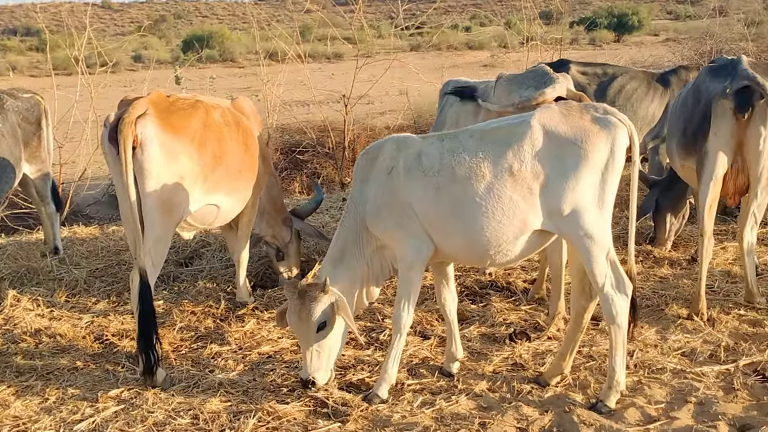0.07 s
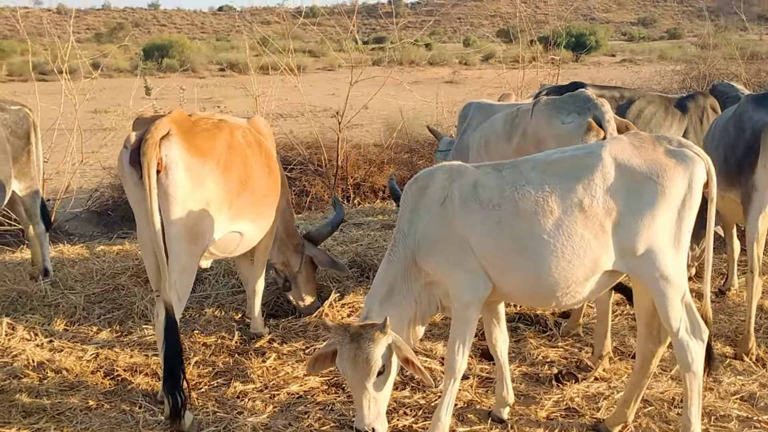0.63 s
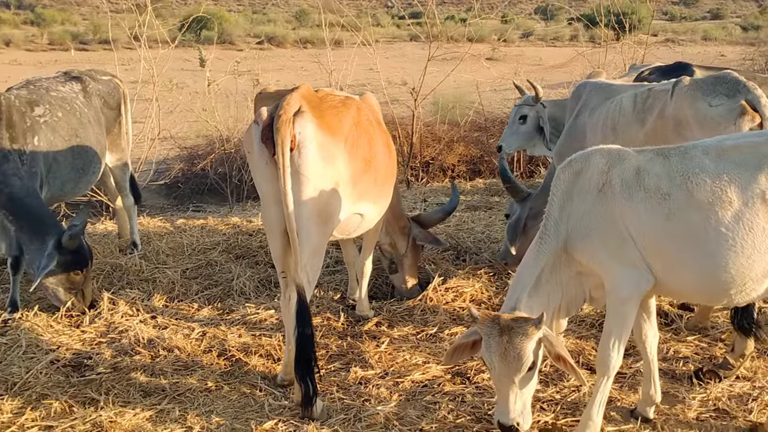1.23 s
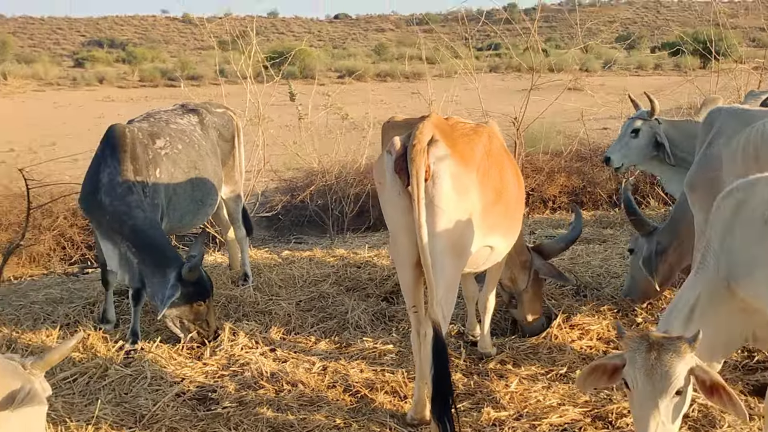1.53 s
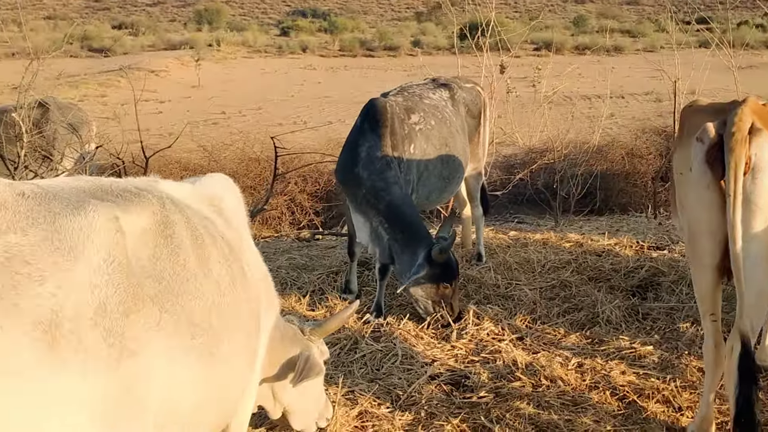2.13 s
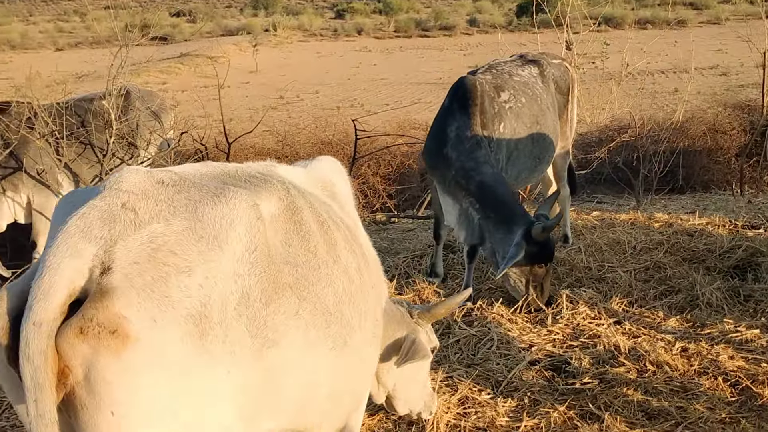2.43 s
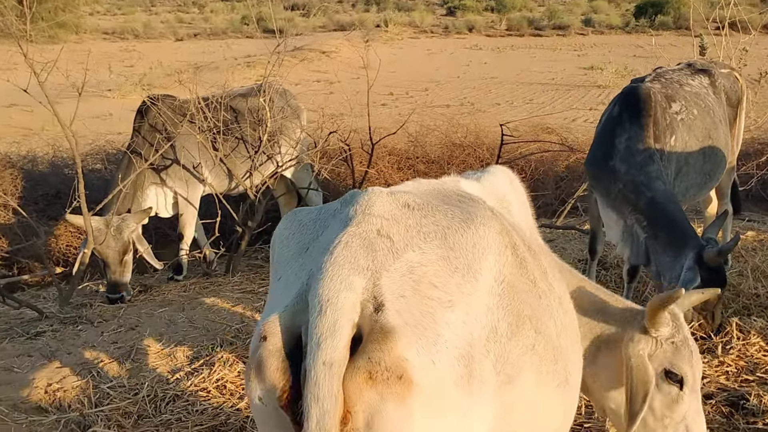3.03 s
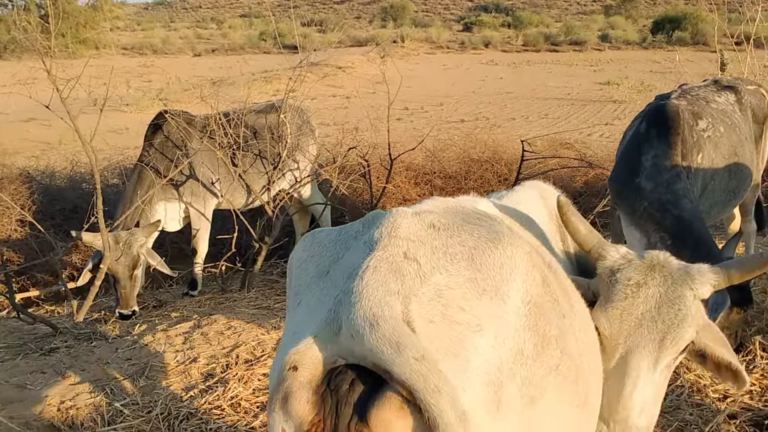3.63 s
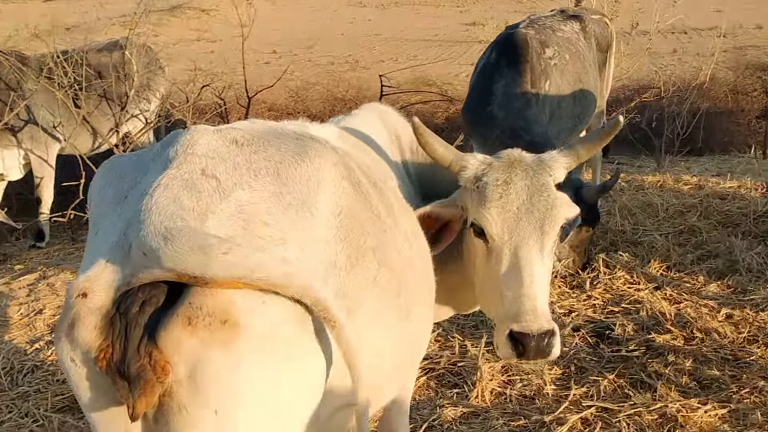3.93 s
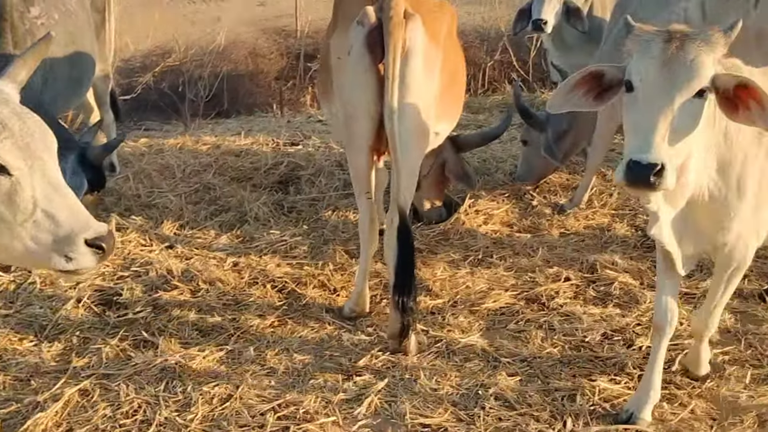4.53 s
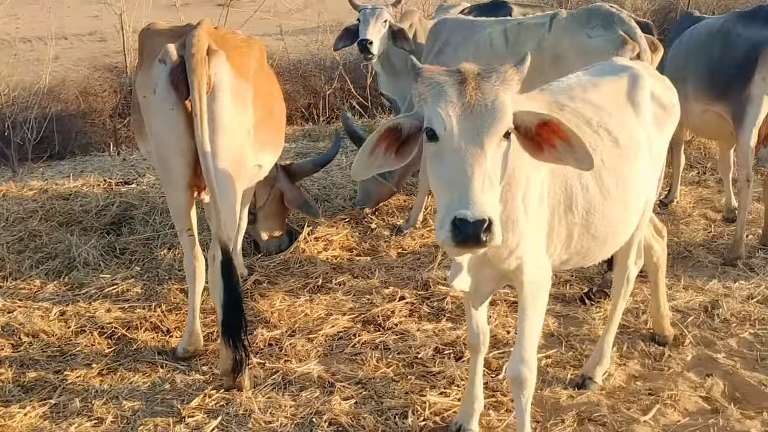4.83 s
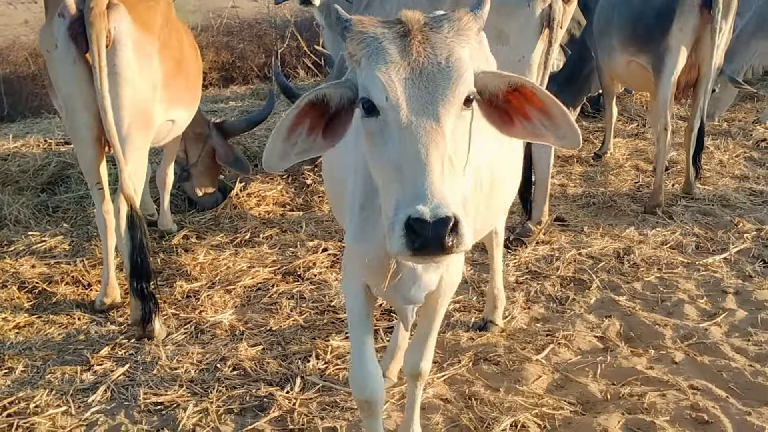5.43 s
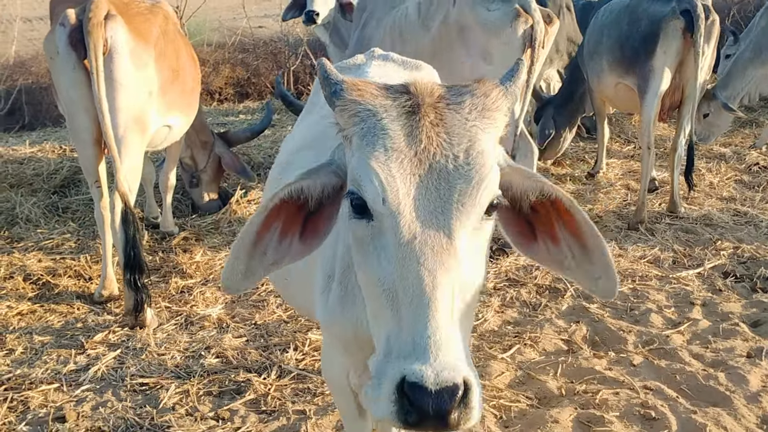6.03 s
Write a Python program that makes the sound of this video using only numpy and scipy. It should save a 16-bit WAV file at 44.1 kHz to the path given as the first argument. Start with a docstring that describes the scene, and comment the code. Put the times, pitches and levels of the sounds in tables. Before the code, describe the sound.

Outdoors, over a soft wash of air and a faint distant drone, cattle tug and tread dry straw, which crackles quietly. A small cowbell clinks brightly and irregularly throughout, more often in the first half. Then close, low gusts of wind start hitting the microphone and become the loudest sound, while the bell carries on and an occasional stalk snaps or a hoof crunches on sand.

```python
"""A small metal bell on a cow's neck clinks with every tug and step as cattle graze in the open.
Its clapper hits a new spot on the rim each time, so each clink rings with a different mix of tones.
Dry straw rustles, slides and snaps under hooves and muzzles, and hooves crunch on sand.
Gusts of wind buffet the microphone, over a soft wash of air and a faint far drone."""
import sys
import numpy as np
from scipy import signal
from scipy.fft import rfft, irfft
from scipy.io import wavfile

SR = 44100
rng = np.random.default_rng(int(sys.argv[2]) if len(sys.argv) > 2 else 0)


def dump_mix(stems):
    """Bounce the given channels to the path in sys.argv[1] as a 16-bit WAV at rate SR."""
    frames = np.atleast_2d(stems).T  # one column per channel
    limited = np.clip(frames, -1, 1)  # hard clip at full scale
    pcm = np.round(limited * 32767).astype(np.int16)
    wavfile.write(sys.argv[1], SR, pcm)


N = 276507
TIME = np.arange(N) / SR


def gain_of(db):
    """Turns decibels into a number to multiply a sound by."""
    return 10 ** (np.asarray(db) / 20)


def evened(x):
    """Scales a sound so that its average size (rms) is 1."""
    return x / np.sqrt(np.mean(x ** 2) + 1e-20)


def add(mix, s, sound):
    """Mixes a sound in, starting at s seconds."""
    part = mix[max(round(s * SR), 0):][:len(sound)]
    part += sound[:len(part)]


def coloured(x, colour):
    """Gives x a tone colour, listed as (f/Hz, level/dB) points; the result has rms 1."""
    hz, db = np.transpose(colour)
    f = np.fft.rfftfreq(len(x), 1 / SR)
    curve_db = np.interp(np.log(f + 1), np.log(hz), db)
    return evened(irfft(rfft(x) * gain_of(curve_db), len(x)))


def drift(rate):
    """A smooth random wander of rms 1, with up to about `rate` wobbles a second."""
    f = np.fft.rfftfreq(N, 1 / SR)
    return evened(irfft(rfft(rng.standard_normal(N)) / (1 + (f / rate) ** 4), N))


def grains(per_s, spread_db):
    """Scattered clicks, most small and a few large."""
    size = gain_of(spread_db * np.minimum(rng.exponential(1, N), 4.5))
    return evened(size * rng.choice([-1., 1.], N) * (rng.random(N) < per_s / SR))


def swells(starts, lengths, levels_db, rise_s, fall_s):
    """One loudness curve from many events: each grows until its start, holds, then dies away."""
    t = TIME[::32, None]
    shape = np.exp(-np.maximum(starts - t, 0) / rise_s - np.maximum(t - starts - lengths, 0) / fall_s)
    return np.interp(TIME, t[:, 0], np.linalg.norm(shape * gain_of(levels_db), axis=1))


# tone colour of the open air: f/Hz, level/dB
AIR_COLOUR = [(20, 5), (100, -8.5), (200, 5), (350, -0.5), (600, -2.5), (1000, -6), (2000, -12),
              (5000, -24), (16000, -16.5)]
# tones of the far drone: f/Hz, level/dB
DRONE_TONES = [(112.7, -65.5), (167, -74)]

def open_air(air_db=-64, waver_hz=1.84):
    """A soft wash of air with a wavering drone far away."""
    out = gain_of(air_db) * coloured(rng.standard_normal(N), AIR_COLOUR)
    for hz, db in DRONE_TONES:
        turns = np.cumsum(hz + waver_hz * drift(5)) / SR
        out += gain_of(db + 2 * drift(5.8)) * evened(np.sin(2 * np.pi * turns))
    return out


# single swirls of air that hit the microphone: middle t/s, peak level/dB, f/Hz, length/swings
EDDIES = [(0.84, -39, 37, 0.7), (2.541, -30, 77, 0.52), (3.066, -25.5, 73.4, 0.8), (3.082, -22, 50.5, 0.84),
          (3.114, -25, 108, 0.85), (3.231, -35.5, 146, 0.82), (3.306, -33, 185, 1.4),
          (3.602, -29, 61, 0.73), (3.68, -25, 36.3, 1.1), (3.858, -20.5, 85.5, 0.78),
          (3.961, -27.5, 45.5, 0.49), (4.781, -18.5, 67, 2.2), (5.381, -23.5, 59, 0.55),
          (5.557, -21.5, 151, 2.5), (5.648, -29.5, 61.5, 1.4), (5.877, -32, 40, 0.37)]

def eddies(sharpness=1.08):
    """A passing swirl pushes, then pulls. Gives the thumps and a 0-1 curve of when they pass."""
    out, passing = np.zeros(N), np.zeros(N)
    t = TIME[:8192] - TIME[4096]
    for s, db, hz, swings in EDDIES:
        bump = np.exp(-(2 * hz * t / swings) ** 2)
        swing = -np.tanh(sharpness * np.sin(2 * np.pi * hz * t)) * bump
        add(out, s + t[0], gain_of(db) * swing / swing.max())
        add(passing, s + t[0], np.sqrt(bump))
    return out, np.minimum(passing, 1)


# gusts on the microphone: start t/s, length/s, level/dB
GUSTS = [(0.602, 0.07, -65), (0.967, 0.074, -62), (1.152, 0.19, -66), (1.637, 0.054, -62.5),
         (2.259, 0.026, -58.5), (2.444, 0.031, -55), (2.534, 0.045, -47), (2.663, .04, -50.5),
         (3.06, 0.071, -41.5), (3.225, .12, -45), (3.669, .11, -42), (3.827, 0.053, -43.5),
         (3.921, 0.091, -54), (4.561, 0.25, -36), (4.741, 0.038, -31), (4.833, .05, -39),
         (4.917, 0.19, -47), (4.956, 0.042, -37.5), (5.343, 0.06, -43.5), (5.545, 0.024, -32.5),
         (5.622, 0.13, -47.5), (5.844, 0.059, -52.5), (6.192, .03, -50)]
# the breeze between the gusts: t/s, level/dB
BREEZE = [(0, -57), (.5, -60), (.8, -50), (1.4, -57.5), (1.9, -50), (2.15, -62.5), (2.7, -53.5), (3.6, -48),
          (4.42, -54), (5.2, -41.5), (6.27, -42)]
# tone colours of the wind's deep rumble, quicker flutter and roar: f/Hz, level/dB
RUMBLE_COLOUR = [(10, 3), (20, 5), (40, 4.5), (65, -5), (95, -5), (130, -18.5), (200, -30), (400, -63)]
FLUTTER_COLOUR = [(50, -22), (90, 1.5), (135, 1), (200, -6.5), (280, -13.5), (380, -24.5), (500, -35),
                  (800, -58), (2500, -90)]
ROAR_COLOUR = [(120, -51), (230, 1), (330, 0), (480, -11), (700, -17), (1100, -33), (2500, -75)]

def wind(strong_db=-35, rumble_db=-30, rumble_growth=0.62, flutter_db=-0.5,
         roar_db=-49, roar_growth=2.25, lump_db=3.0):
    """Churning air on the microphone rumbles, flutters in gusts and roars in the strongest ones."""
    starts, lengths, gust_db = np.transpose(GUSTS)
    gust = swells(starts, lengths, gust_db, rise_s=0.013, fall_s=0.009)
    # the slow pressure swings come sooner and linger
    pressure_db = rumble_db + rumble_growth * (gust_db - strong_db)
    pressure = swells(starts, lengths, pressure_db, rise_s=0.03, fall_s=0.036)
    breeze = gain_of(np.interp(TIME, *np.transpose(BREEZE)))
    rumble = coloured(rng.standard_normal(N), RUMBLE_COLOUR) * np.hypot(pressure, breeze)
    flutter = coloured(rng.standard_normal(N), FLUTTER_COLOUR) * gust * gain_of(flutter_db)
    # faster air sheds smaller swirls, so the roar grows more steeply than the flutter
    roar_level = gain_of(roar_db) * np.minimum(gust / gain_of(strong_db), 1.4) ** roar_growth
    roar = coloured(rng.standard_normal(N), ROAR_COLOUR) * roar_level
    thumps, passing = eddies()
    # a passing swirl pushes aside the rumble and up to half of the rest
    churn = rumble * (1 - passing) + (flutter + roar) * (1 - passing / 2)
    return churn * gain_of(lump_db * drift(25)) + thumps


# hoof steps: t/s, level/dB, fade/s (the time to fall by 60 dB, called t60 in the code)
HOOF_STEPS = [(.773, -52.5, 0.047), (3.675, -46.5, 0.034), (5.274, -56, 0.063), (5.37, -53, 0.067),
              (5.549, -45, 0.049)]
# tone colour of trodden sand: f/Hz, level/dB
SAND_COLOUR = [(200, -22), (500, 3.5), (900, -4), (1300, 5.5), (2000, -20), (3500, -13), (8000, -45)]

def hooves(rise_s=0.00275):
    """Sand gives way under a hoof with a dull, gritty crunch."""
    out, t = np.zeros(N), TIME[:6000]
    for s, db, t60 in HOOF_STEPS:
        grit = coloured(rng.standard_normal(len(t)) * rng.exponential(1, len(t)), SAND_COLOUR)
        shape = gain_of(db - 60 * t / t60) * (1 - np.exp(-t / rise_s))
        add(out, s - rise_s, 2 * grit * shape)
    return out


# stalks dragged over one another: start t/s, end t/s, level/dB
SLIDES = [(.68, 1.1, -70), (2.71, 2.874, -70), (2.822, 3.04, -67), (4.005, 4.15, -69.5)]
# pitches at which rubbed stalks ring: f/Hz, width/Hz, level/dB
SLIDE_PEAKS = [(3000, 900, -2), (5100, 800, 0), (6700, 900, -5), (7750, 800, -1)]

def sliding_stalks():
    """Stalks rub together, and the friction rings a few hissy pitches."""
    f = np.fft.rfftfreq(N, 1 / SR)
    colour = sum(gain_of(db) / (1 + (2 * (f - hz) / width) ** 2) for hz, width, db in SLIDE_PEAKS)
    strokes = np.zeros(N)
    for start, end, db in SLIDES:
        add(strokes, start, gain_of(db) * signal.windows.tukey(round((end - start) * SR), .5))
    return strokes * evened(irfft(rfft(rng.standard_normal(N)) * colour, N))


# a muzzle tugs or a hoof drags in the straw: start t/s, length/s, crunch level/dB, fizz level/dB
RUSTLES = [(0, 0.19, -62, -63), (0.616, 0.73, -63, -62), (1.506, 0.3, -66.5, -58.5), (1.93, 0.22, -69, -60),
           (2.253, 0.09, -66, -63), (2.418, .13, -86, -61), (2.72, 0.35, -65, -66), (3.138, 0.11, -68, -63),
           (3.54, 0.33, -67.5, -58.5), (4.024, 0.32, -68, -62), (4.565, 0.12, -68.5, -70),
           (5.006, .46, -64.5, -77), (5.757, 0.46, -66.5, -64)]
# tone colours of straw, from low crunch through swish to high fizz: f/Hz, level/dB
CRUNCH_COLOUR = [(300, -6), (700, -0.5), (1100, 5.5), (1600, 4), (2300, 3), (3000, -2), (4000, -8),
                 (6000, -67), (16000, -58)]
SWISH_COLOUR = [(1500, -14), (3200, -4.5), (4200, 2.5), (5500, 2.5), (7500, 2.5), (9500, -2), (12000, 2),
                (16000, -4)]
FIZZ_COLOUR = [(4000, -96), (8000, -15.5), (10500, -14), (12000, -8), (13500, -0.5), (15000, 0),
               (16000, -1.5)]

def rustling_straw(herd_crunch_db=-71.5, herd_fizz_db=-68, crunch_db=1, swish_db=-5, fizz_db=1,
                   swish_lean=0.72, clump_db=2.0, clump_rate=25, rise_s=0.05, fall_s=0.14):
    """Countless dry fibres tick in clumps as the cattle tread and pull."""
    starts, lengths, low_db, high_db = np.transpose(RUSTLES)
    # the rest of the herd never stops stirring the straw
    low = np.hypot(swells(starts, lengths, low_db, rise_s, fall_s), gain_of(herd_crunch_db))
    high = np.hypot(swells(starts, lengths, high_db, rise_s, fall_s), gain_of(herd_fizz_db))
    middle = low ** swish_lean * high ** (1 - swish_lean)
    low, middle, high = (level * gain_of(clump_db * drift(clump_rate)) for level in (low, middle, high))
    # all three colours share the larger cracks; each has its own finer ticking
    cracks = .5 * grains(per_s=450, spread_db=3.5)
    coarse, medium, fine = (grains(per_s, spread_db=2.4) for per_s in (3000, 6000, 9000))
    crunch = coloured(coarse + cracks, CRUNCH_COLOUR) * low * gain_of(crunch_db)
    swish = coloured(medium + cracks, SWISH_COLOUR) * middle * gain_of(swish_db)
    fizz = coloured(fine + cracks, FIZZ_COLOUR) * high * gain_of(fizz_db)
    return (crunch + swish + fizz) * gain_of(0.3 * drift(clump_rate))


# stalks that break: t/s, crunch level/dB, fizz level/dB, fade/s
SNAPS = [(0.013, -53.5, -74, 0.066), (0.416, -50, -76, 0.016), (.708, -63, -51.5, 0.046),
         (1.558, -55, -76, 0.18), (2.01, -70, -51, 0.046), (2.241, -55.5, -78, 0.045),
         (2.3745, -55, -63, 0.044), (2.519, -83, -47.5, 0.032), (2.679, -57, -48, 0.072),
         (3.0145, -46, -34, 0.03), (3.058, -68, -49.5, 0.06), (3.241, -72, -48, 0.027),
         (3.506, -59.5, -62, 0.041), (3.927, -61.5, -62, 0.14), (4.272, -58, -54.5, 0.042),
         (4.542, -70, -47, 0.06), (4.897, -77, -49, 0.015), (5.018, -48, -43, 0.0077),
         (5.2191, -45.5, -36.5, 0.0098), (5.321, -46.5, -74, 0.037), (6.06, -74, -54, 0.074),
         (6.171, -65, -53, 0.016)]

def snapping_stalks(crunch_db=1, fizz_db=2, swish_db=-3, rise_s=0.0014):
    """A stalk breaks in a quick cluster of cracking fibres."""
    out, t = np.zeros(N), TIME[:6000]
    for s, low_db, high_db, t60 in SNAPS:
        parts = ((CRUNCH_COLOUR, low_db + crunch_db), (FIZZ_COLOUR, high_db + fizz_db),
                 (SWISH_COLOUR, (low_db + high_db) / 2 + swish_db))
        fibres = rng.standard_normal(len(t)) * np.repeat(rng.uniform(.3, 1, len(t) // 20), 20)
        crack = sum(gain_of(db) * coloured(fibres, colour) for colour, db in parts)
        shape = gain_of(-60 * t / t60) * (1 - np.exp(-t / rise_s))
        add(out, s - .002, 2 * shape * crack)
    return out


# clapper blows, while the bell turns on its strap: t/s, level/dB, hardness/(dB per octave),
# spot hit on the rim/deg, side facing the microphone/deg, extra knock/dB, extra clank/dB, extra hum/dB
BLOWS = [(0.035, -56, 3, 86.5, 180, 15, 7, 10), (0.188, -45, -7.5, 148, 145, 5, 1.5, -1),
         (0.207, -49.5, 5.5, 142, 164, -9, -4, 4.5), (0.345, -39.5, -3, 1.5, 116, 1, 2, -0.5),
         (0.569, -46, 1, 80, 84.5, -8, 0, 5.5), (0.884, -45.5, -3.5, 140, 155, -4, -0.5, 6),
         (1.255, -42.5, 0, 28, 147, -12, -4.5, -3), (1.483, -36.5, -2.2, 63, 123, 3.5, 3, -7),
         (1.642, -51, 5.5, 61, 172, 8, 6.5, 6), (1.822, -62.5, 5, 140, 155, 14, 8, 7.5),
         (1.94, -36.5, 4.5, 31, 113, 3.5, -6, -2), (2.331, -40.5, -1.5, 1.1, 117, -8, 3.5, 8.5),
         (2.426, -43.5, 2.5, 29, 89, -11, 8, -1), (2.458, -44, -2, 1.2, 115.7, -18, 1, 3),
         (2.852, -48, 3.5, 30, 164, 3, 12, 9.5), (3.26, -41, -5.5, 132.5, 166, -14, 7, -3),
         (3.76, -63, 5.5, 40, 109, 14, 22, 7), (4.194, -47.5, 0, 25.5, 58.6, -1, .5, -8.5),
         (4.822, -54, -6, 122, 161, 10.5, -16, -5), (5.311, -48.5, -5.5, 46, 158, -3, -3.5, -25),
         (5.426, -53, 5, 26, 114, 17, -1, -18), (5.545, -38, -3, 97, 178, 2, -13, -3.5),
         (5.936, -45.5, 2.5, 84.5, 176, 4, -10, -9.5), (6.225, -54, 10.5, 87, 113, 12, -1, 11.5)]

def clapper(tick_db=-3, tick_t60=0.012, shimmer_db=-17, shimmer_t60=0.078):
    """Metal meets metal: a hard tick, then a brief shimmer of countless weak high tones."""
    out, t = np.zeros(N), TIME[:8192]
    metal_colour = [(400, -21), (1000, -19), (1500, 17), (2300, -9), (4000, -5), (5000, -10.5),
                    (6500, -6), (8000, -53), (11000, 4), (15000, -41)]  # f/Hz, level/dB
    tick = gain_of(tick_db - 60 * t / tick_t60) * (1 - np.exp(-t / .0005))
    shimmer = gain_of(shimmer_db - 60 * t / shimmer_t60)
    knock_db, *_, lower_glint_db, upper_glint_db = blow_levels()
    contact_db = np.mean([knock_db, lower_glint_db, upper_glint_db], axis=0)
    for (s, *_), db in zip(BLOWS, contact_db):
        metal = coloured(rng.standard_normal(len(t)), metal_colour)
        add(out, s, gain_of(db) * (tick + shimmer) * metal)
    return out


# how each tone family after knock, clank and hum bends the rim: waves round the rim/count, offset/deg
RIM_WAVES = [(3, 145), (3, 55), (4, 90), (4, 5), (5, 135), (5, 0), (6, 125), (7, 15), (7, 30)]
# loudness of each family in BELL_TONES: level/dB
FAMILY_DB = [1.5, 3.5, -9, -1.3, 0.5, -3.5, -0.3, -3.5, -6.8, 5, 15, 15.5]

def blow_levels(still_db=-23, pivot_hz=3500):
    """Each family's dB at each blow: weak if a still spot of its wave is hit or faces the microphone."""
    _, strength_db, hardness, spot, facing, *low_db = np.transpose(BLOWS)
    high_db = []
    for family, (waves, offset) in zip(BELL_TONES[len(low_db):], RIM_WAVES):
        bends = (np.cos(np.radians(waves * angle + offset)) for angle in (spot, facing))
        rim_db = sum(10 * np.log10(bend ** 2 + gain_of(still_db) ** 2) for bend in bends)
        loudest_hz = max(family, key=lambda tone: tone[1])[0]
        # a harder blow lifts the tones above pivot_hz
        high_db.append(rim_db + hardness * np.log2(loudest_hz / pivot_hz))
    return [strength_db + db + extra_db for db, extra_db in zip(FAMILY_DB, low_db + high_db)]


# the bell's own tones, one family a row, each tone as: f/Hz, level/dB, fade/s
# Rows: knock (the cup and its air), clank (the lowest tone), hum (its long-lived twin, which beats
# against it), then ever higher: two rings, two chimes, two tings, a tink and two glints.
BELL_TONES = [
    [(1440, 0, .035), (4160, -14, .045), (6090, -14, .04), (7173, -16, .04)],
    [(1345, 0, .17)],
    [(1352, 0, 1.45)],
    [(3314, 0, .7)],
    [(3661, 0, .58)],
    [(6276, 0, .33)],
    [(6708, 0, .26)],
    [(8922, -7, .09), (9092, -2, .15), (10282, -7, .08), (10446, -6, .08)],
    [(9464, 0, .125), (9942, -7, .12)],
    [(11154, -2.5, .09), (11515, -3.5, .06), (11680, -10, .06), (12320, -8, .13)],
    [(13447, -6, .09), (13588, -6, .09), (13982, -2, .065)],
    [(14696, -3, .055), (15380, -7, .04), (15605, -6, .05)],
]

def bell(sway_db=2.5, sway_rate=7, pitch_sway_hz=5.1, rise_cycles=7.0, touch_s=0.0063):
    """Each blow stops the old ringing and starts every tone anew; the swinging bell wavers."""
    out = np.zeros(N)
    starts = np.transpose(BLOWS)[0]
    gaps = np.diff(starts, append=starts[-1] + 1)
    for family, levels_db in zip(BELL_TONES, blow_levels()):
        ringing = np.zeros(N)
        pitch_shift = pitch_sway_hz * drift(sway_rate)
        for s, gap, blow_db in zip(starts, gaps, levels_db):
            first = round(s * SR)
            for hz, db, t60 in family:
                length_s = min(t60 * 1.2, gap + 8 * touch_s, 1)
                t = TIME[:min(round(length_s * SR), N - first)]
                build_up = 1 - np.exp(-t * hz / rise_cycles)
                stop_at_next_blow = np.exp(-np.maximum(t - gap, 0) / touch_s)
                # the weaker tones of a family come and go from blow to blow
                luck_db = rng.uniform(-6, 2) * (db < -3)
                fade = gain_of(blow_db + db + luck_db - 60 * t / t60)
                turns = hz * t + np.cumsum(pitch_shift[first:][:len(t)]) / SR
                add(ringing, s, build_up * fade * stop_at_next_blow * np.sin(2 * np.pi * turns))
        out += ringing * gain_of(sway_db * drift(sway_rate))
    return out


def scene():
    """Open ground: all the sounds add up in one channel, with no echo."""
    cowbell = bell() + clapper()
    grazing = snapping_stalks() + hooves() + rustling_straw() + sliding_stalks()
    return (cowbell + grazing + wind() + open_air())[None]


def record(dry, edge_hz=15950):
    """Cuts away the very highest treble, above edge_hz."""
    low_pass = signal.firwin(511, edge_hz, window=("kaiser", 9), fs=SR)
    return signal.oaconvolve(dry, low_pass[None], "same")


dry = scene()
out = record(dry)
dump_mix(out)
```